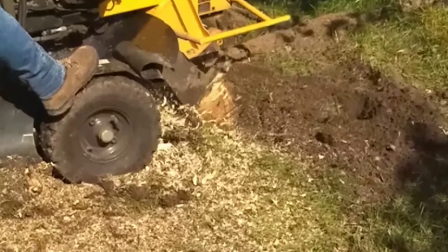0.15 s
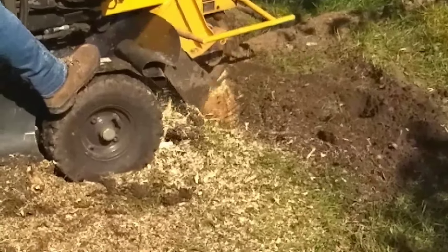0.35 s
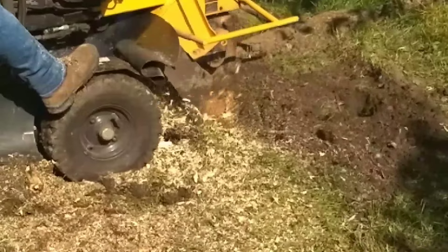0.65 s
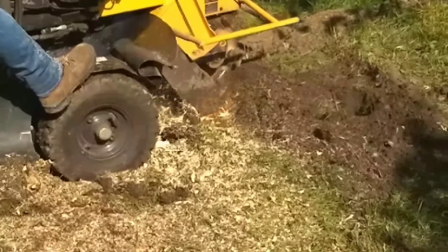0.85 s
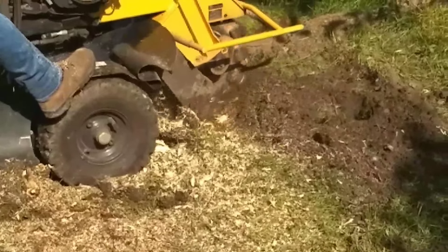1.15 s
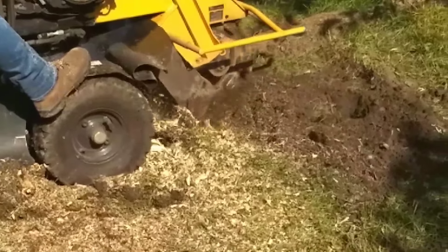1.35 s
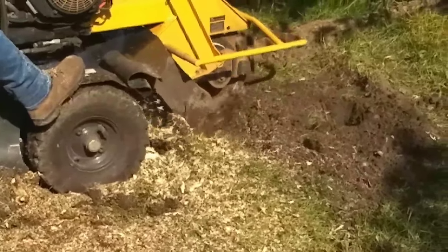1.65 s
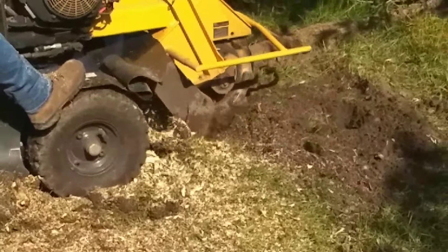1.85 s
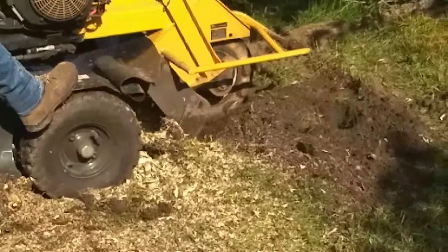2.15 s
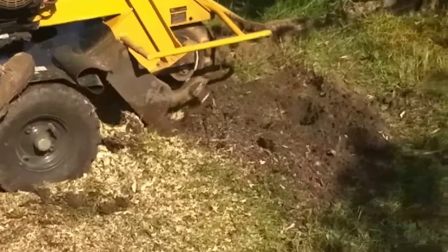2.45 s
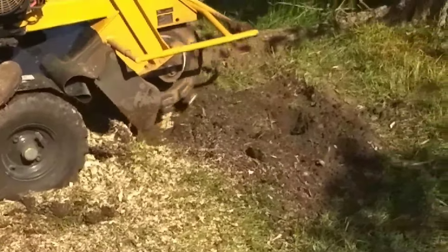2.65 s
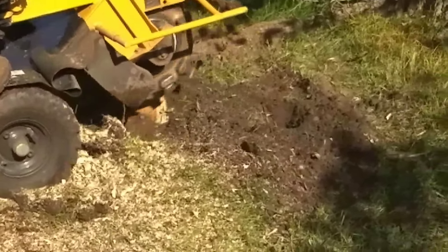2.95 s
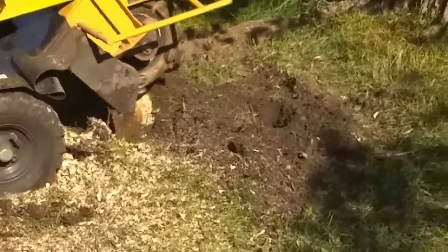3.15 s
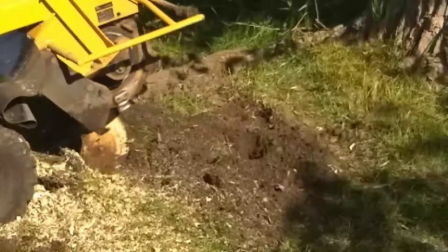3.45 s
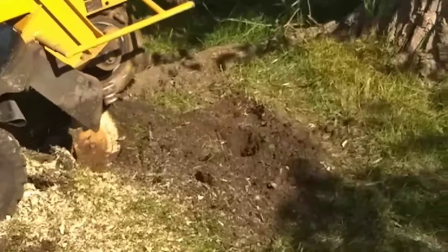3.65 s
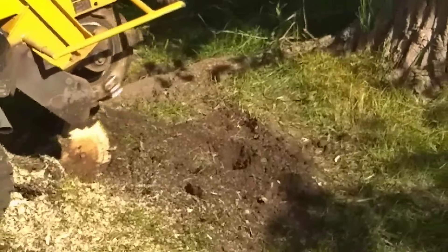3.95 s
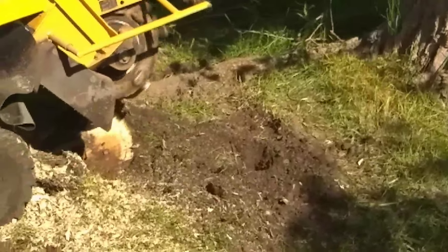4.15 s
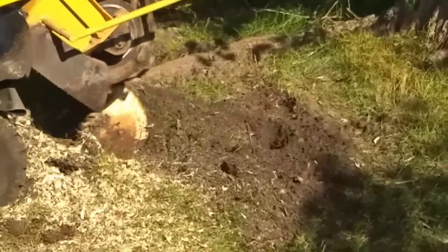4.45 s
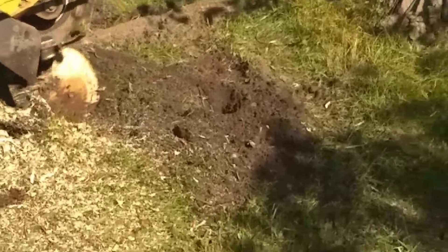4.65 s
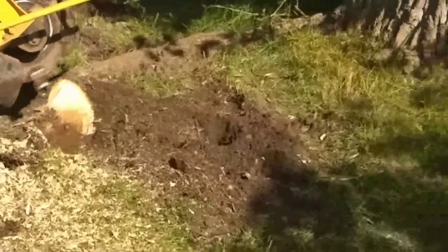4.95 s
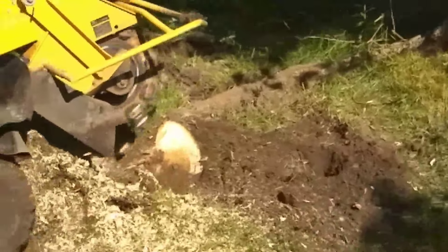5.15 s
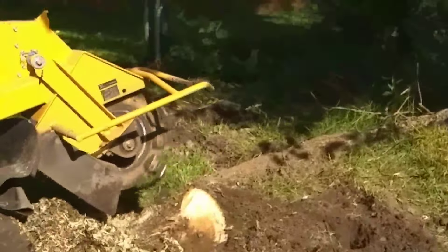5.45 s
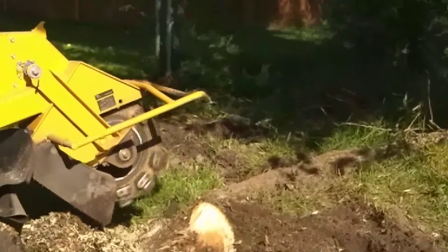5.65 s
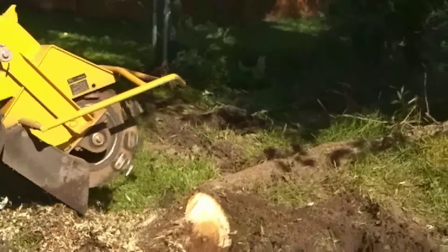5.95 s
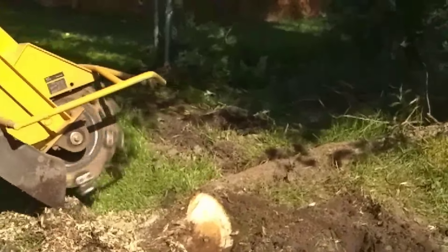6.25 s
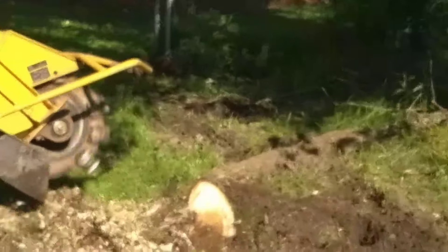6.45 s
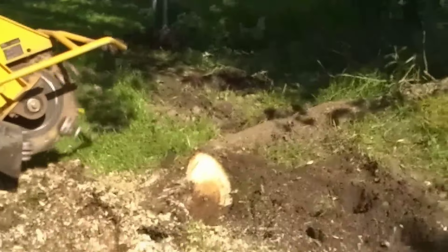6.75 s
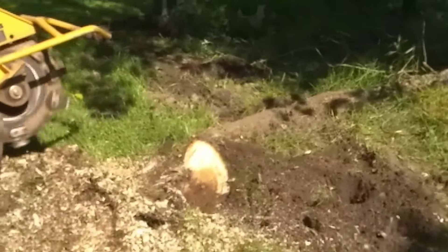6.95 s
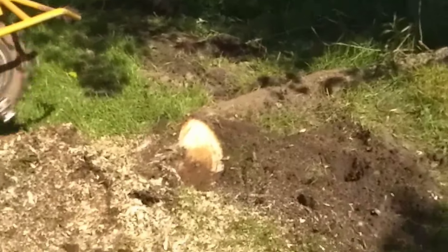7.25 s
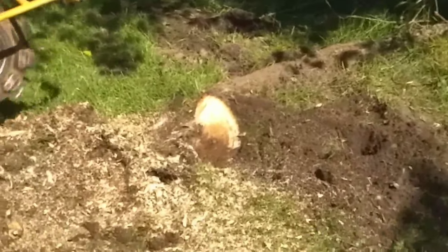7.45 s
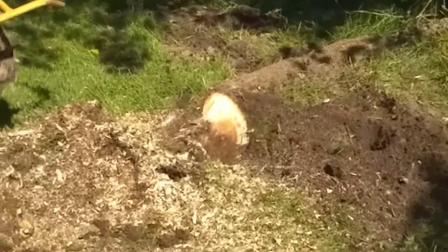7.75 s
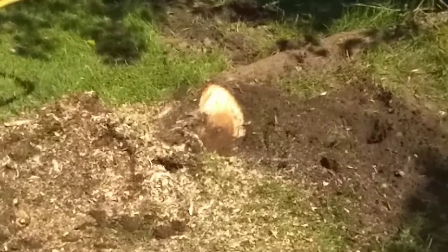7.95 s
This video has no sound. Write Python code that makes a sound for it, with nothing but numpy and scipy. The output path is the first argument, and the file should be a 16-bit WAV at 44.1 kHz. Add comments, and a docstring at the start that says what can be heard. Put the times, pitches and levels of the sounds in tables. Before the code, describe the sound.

Close by in a garden, a stump grinder's petrol engine runs loudly and steadily while the wheel's teeth rattle and rasp through wood. Early on comes a short burst of hard, ringing strikes. The grinding then fades, the engine picks up slightly, and the machine roars on unloaded, its wheel and drive whines swelling and fading in the hand-held microphone.

```python
"""A petrol stump grinder roars at full throttle in a garden, its wheel chewing a root.
The wheel strikes something hard, then spins free while the machine backs away. Teeth knock the wheel
into ringing and tear fibres; twin-cylinder exhaust and drive whine are tones geared to the engine;
casing, fan, muffler and a singing panel are band noise. A hand-held recorder mixes two capsules
to stereo and pulls its gain down at the hard strikes."""
import sys
import numpy as np
from scipy import signal
from scipy.fft import rfft, irfft, next_fast_len
from scipy.io import wavfile
from scipy.ndimage import map_coordinates

SR = 44100
rng = np.random.default_rng(int(sys.argv[2]) if len(sys.argv) > 2 else 0)


def put_to_file(sound):
    """Save the sound as 16-bit audio at rate SR, in the file named by the first command-line argument."""
    columns = np.atleast_2d(sound).T  # one column per channel
    safe = np.clip(columns, -1, 1)
    whole_steps = np.round(safe * 32767)
    wavfile.write(sys.argv[1], SR, whole_steps.astype(np.int16))


N = 357210
STEP = 40   # samples per control step

# A *_MOVE row: value in the hole, change with the lift, change with the turn while backing away.
LIFT_S, TURN_S = (1.27, 2.64), (3.4, 8.1)
PANEL_HZ, PANEL_WIDTH_HZ, PANEL_DB_MOVE = 3825, 447, (-49.5, 9, 9)
GROUND_LAGS_MS, GROUND_BAND_HZ = (0.61, 0.73), [1550, 6800]
GROUND_SHARES_MOVE = [(0.02, -0.15, -0.16), (0.022, 0.17, -0.081)]   # signed, a row per capsule

# four-stroke engine, recovering as the load comes off, then hunting: time_s, cycle_hz
ENGINE_SPEED = [(0, 28.3), (.62, 29.3), (1.0, 30.3), (1.3, 30.65), (1.55, 30.45), (2.5, 30.91),
                (3.75, 30.67), (4.4, 30.77), (4.8, 30.72), (5.25, 30.54), (5.8, 30.48), (6.5, 30.51),
                (7.4, 30.72), (7.8, 30.55), (8.1, 30.5)]
# roar of casing, fan and muffler: freq_hz, density_db
ROAR_SPECTRUM = [(40, -34), (100, -1), (220, -2.5), (380, 0.5), (550, 6.5), (900, 0.5), (1400, -3.5),
                 (2000, -8.5), (2500, -10), (2900, -14.5), (3300, -13), (3800, -8.5), (4500, -10),
                 (5500, -11), (7000, -19), (10000, -14.5), (15500, -9.5)]
# roar parts (rumble, roar, clatter, fizz, rasp, whirr, hiss): centre_hz
ROAR_PARTS_HZ = [250, 900, 1700, 2900, 3800, 6000, 11000]
# per roar part: hole_db, lift_change_db, turn_change_db
ROAR_PARTS_DB_MOVE = [(-25, 2, 0.5), (-23.5, 4.5, 0), (-21, 2.5, 2), (-17.5, -3.5, 3), (-20, 0, 4),
                      (-20, 5.5, -1.5), (-15.5, -0.6, 1.8)]
# roar as the distance shifts: time_s, gain_db
ROAR_NEARNESS = [(0, 2), (.7, 2.5), (1.4, 1.5), (1.9, 3), (2.3, 2), (2.62, 3.5), (2.9, 2), (3.2, 1.5),
                 (3.45, 3), (3.8, 2.34), (4.3, 2.3), (4.8, 1.5), (5.3, 2), (5.8, 2), (6.1, .5), (6.5, -0.5),
                 (6.9, 0), (7.3, .5), (8.1, 2)]
# likeness of the roar at the two capsules: freq_hz, coherence
ROAR_COHERENCE = [(60, 0.6), (250, 0.7), (800, 1), (2000, 0.4), (5000, 0), (9000, 0), (15000, 0.4)]

# wheel whine: multiple of the tooth-group rate
WHEEL_ORDERS = [4, 6, 7, 8, 9, 9, 9, 12, 12, 15, 15, 15, 15]
# per wheel order, swelling as a side of the machine faces the listener: peak_db, centre_s, width_s
WHEEL_SWELLS = [(-40.5, 7.4, 2.4), (-37.5, 3.05, 2.34), (-35, 4.66, 2.46), (-34.5, 3.7, 1.2),
                (-28, 6.72, 0.48), (-31, 5.87, 0.28), (-29, 7.5, 0.37), (-31, 2.65, .9), (-31, 5.02, 1.17),
                (-33.5, 5.52, 0.58), (-30.5, 6.62, 0.29), (-30.5, 8.05, 0.72), (-34, 2.84, 1.6)]
# engine whine: multiple of the cycle rate
ENGINE_ORDERS = [4, 5, 5, 32, 40, 44, 44, 48, 56]
# per engine order: peak_db, centre_s, width_s
ENGINE_SWELLS = [(-36.5, 1.8, 2.5), (-26.5, 0.59, 0.34), (-34, 6.7, 3.9), (-34.5, 0.48, 0.1),
                 (-35, 2.57, 1.44), (-34.5, 3.7, 1.34), (-37.5, 0.18, 0.37), (-39, 5.4, 1.64),
                 (-40, 2.7, 1.3)]
# hydraulic drive whine: multiple of the cycle rate
PUMP_ORDERS = [24.97, 26.54, 26.54, 26.54, 29.55, 32.45, 32.45, 32.45, 32.45]
# per pump order: peak_db, centre_s, width_s
PUMP_SWELLS = [(-38.5, 6.6, 1.07), (-26, 3.58, 0.31), (-37, 1.96, 0.47), (-32.5, 4.5, .3), (-37, 5.1, 1.7),
               (-28, 3.33, 0.23), (-29, 4.15, .3), (-30, 4.9, 0.16), (-34.5, 7.2, 0.56)]

# exhaust tones: multiple of the cycle rate
EXHAUST_ORDERS = [2, 3, 6, 7, 8, 9, 10, 12, 14]
# per exhaust order: relative_db
EXHAUST_ORDER_DB = [-3.5, -17, -5.5, -18.5, -16.5, -16.5, -25, -26.5, -21]
# per exhaust order, under the opening load: change_db
EXHAUST_LOAD_DB = [5, 2, -0.2, 7, -3.5, -4, .1, 5, 10]
EXHAUST_DB_MOVE = (-30, 0.7, -2.5)
GROUPS_PER_CYCLE, SLIP_PER_CYCLE, GRIP_S = 2.293, 0.055, 1.2   # tooth groups; belt slip dies away

# modes of wheel and guard: freq_hz, gain_db, t60_s
WHEEL_MODES = [(1760, 1.5, 0.0047), (1180, -13, 0.019), (3120, -6.5, 0.0029), (3720, 0.5, 0.0061),
               (5840, -29, .005), (8700, -35, 0.0032)]
# teeth in the wood: time_s, bite_db, rasp_hz
WOOD_BITE = [(0, -34, 1253), (.35, -28.5, 1240), (.5, -29.5, 1130), (.7, -29.5, 1178), (1.0, -28.5, 1127),
             (1.25, -31.5, 1100), (1.35, -32, 1130), (1.43, -27.5, 1133), (1.5, -34, 1125),
             (1.8, -31, 1132), (2.5, -47, 1140)]
# tooth groups biting harder grain: near_s, impulse_db
WOOD_KNOTS = [(0.0389, -19.5), (0.0857, -20), (0.1017, -16), (0.2883, -18), (0.5208, -16), (0.5667, -18),
              (0.6116, -14), (0.657, -15), (0.7038, -15), (0.7617, -17), (0.8804, -16), (0.9109, -16),
              (0.9528, -18), (0.9677, -18), (1.0126, -19), (1.0411, -13), (1.1423, -12.5), (1.1718, -14),
              (1.1853, -15), (1.2287, -22), (1.2436, -15), (1.2711, -16), (1.3005, -14), (1.3444, -15)]
# blows on something hard, group after group, then now and again: start_s, impulse_db
HARD_STRIKES = [(1.4165, -15), (1.4303, -11), (1.4443, -4.5), (1.459, 0.5), (1.4729, -3), (1.4886, -9),
                (1.5028, -8), (1.5184, -16), (1.5316, -14), (1.547, -29), (1.5612, -14), (1.6148, -20),
                (1.678, -20), (1.705, -27)]
HARD_SPAN_S, FIRST_FULL_BLOW_S = (1.41, 1.565), 1.4447

# stereo equaliser and notch leak: freq_hz, mid_db, side_db, mid_leak, side_leak
MID_SIDE_PATHS = [(57, 13.5, -13.5, 0.11, .12), (250, 10.5, -6, 0.26, .12), (750, 5, -7, 0.1, 0.13),
                  (1640, 4.5, 8.5, 0.026, 0.19), (2450, 4, 6, 0.017, .2), (2800, 6.5, 11, 0.1, .25),
                  (3620, 4.5, 5, 0.44, 0.1), (4800, 1.5, 1, 0.45, 0.17), (7120, 2.5, 3, 0.43, 0.18),
                  (14000, -16, -15, 0.22, 0.16)]
MATRIX_DELAY_MS, CUTOFF_HZ = 0.4346, 15620
LEAK_MOVE = (0.57, 0.11, 0.32)   # grows as the machine goes off axis
CAPSULE_2_DB_MOVE, CAPSULE_2_LAG_MS_MOVE = (-2, 2.5, 1), (0.034, -0.072, 0.035)


def from_db(db):
    """Decibels to gain."""
    return 10 ** (np.asarray(db) / 20)


def unit_rms(x):
    """Scale to rms 1."""
    return x / np.sqrt(np.mean(x ** 2) + 1e-20)


def in_time(rows):
    """Table columns, interpolated per sample."""
    times_s, *columns = np.transpose(rows)
    return [np.interp(np.arange(N) / SR, times_s, column) for column in columns]


def at_hz(rows, hz, column=1):
    """A table column, interpolated over log frequency."""
    table = np.array(rows)
    return np.interp(np.log(hz), np.log(table[:, 0]), table[:, column])


def per_sample(control):
    """Control steps to samples."""
    return np.interp(np.arange(N) / STEP, np.arange(len(control)), control)


def moved(row):
    """A *_MOVE row, per sample."""
    hole, lift, turn = row
    t = np.arange(N) / SR
    return hole + lift * np.interp(t, LIFT_S, (0, 1)) + turn * np.interp(t, TURN_S, (0, 1))


def filtered(x, order, hz, kind):
    """Butterworth filter."""
    return signal.sosfilt(signal.butter(order, hz, kind, fs=SR, output="sos"), x)


def drift(rate_hz):
    """Slow random control, rms 1."""
    pole = np.exp(-2 * np.pi * STEP * rate_hz / SR)
    settle = 2000
    white = rng.standard_normal(N // STEP + 1 + settle)
    return unit_rms(signal.lfilter([1], [1, -2 * pole, pole * pole], white)[settle:])


def tone(turns, rms, waver_db, wobble_rad):
    """A sine on a phase control, wavering in level and phase."""
    phase = 2 * np.pi * (turns + rng.random()) + wobble_rad * (drift(3.4) + 0.59 * drift(10.7))
    amplitude = np.sqrt(2) * rms * from_db(waver_db * drift(8.1))
    return per_sample(amplitude) * np.sin(per_sample(phase))


def panel():
    """A panel sings in the air stream: flickering noise in one resonance."""
    band_hz = [PANEL_HZ - PANEL_WIDTH_HZ / 2, PANEL_HZ + PANEL_WIDTH_HZ / 2]
    level_db = moved(PANEL_DB_MOVE) + per_sample(1.2 * drift(4))
    return from_db(level_db) * unit_rms(filtered(rng.standard_normal((2, N)), 1, band_hz, "band"))


def with_ground_echo(x):
    """Treble arrives again off the ground, with its own lag at each capsule."""
    late = [np.pad(one, (round(ms * SR / 1000), 0))[:N] for one, ms in zip(x, GROUND_LAGS_MS)]
    shares = [moved(row) for row in GROUND_SHARES_MOVE]
    return x + shares * filtered(late, 1, GROUND_BAND_HZ, "band")


def roar(cycles):
    """Casing, fan and muffler: flickering third-octave noise, puffed by the firings."""
    nearness_db, = in_time(ROAR_NEARNESS)
    parts_db = np.array([moved(row) + nearness_db for row in ROAR_PARTS_DB_MOVE])[:, ::STEP]
    edges_hz = 41 * 2 ** np.arange(0, 8.7, 1 / 3)
    sway_db = 0.5 * drift(3)
    phase = 2 * np.pi * cycles
    firing_db = 0.32 * (np.cos(2 * phase) + 0.6 * np.cos(phase + 1) + 0.5 * np.cos(4 * phase))
    white = rng.standard_normal((2, 2, N))
    out = 0
    for k, (low, high) in enumerate(zip(edges_hz, edges_hz[1:])):
        hz = np.sqrt(low * high)
        first, unrelated = filtered(white[k % 2], 2, [low, high], "band")
        coherence = np.clip(at_hz(ROAR_COHERENCE, hz), 0, 1)
        second = coherence * first + np.sqrt(1 - coherence ** 2) * unrelated
        weights = [np.interp(np.log(hz), np.log(ROAR_PARTS_HZ), part) for part in np.eye(len(parts_db))]
        level_db = at_hz(ROAR_SPECTRUM, hz) + np.dot(weights, parts_db) + 6
        flicker_db = sway_db + 1.15 * drift(9) + firing_db
        out = out + per_sample(from_db(level_db + flicker_db)) * np.array([first, second])
    return out


def whine(orders, swells, turns, wobble_rad=1.0, waver_db=2.0, flatness=2):
    """Tones of a rotating part, each swelling and fading; low orders waver less."""
    t = np.arange(len(turns)) * STEP / SR
    out = 0
    for order, (peak_db, centre_s, width_s) in zip(orders, swells):
        swell = from_db(peak_db) * np.exp(-0.5 * np.abs((t - centre_s) / width_s) ** flatness)
        unrest = min(order / 12, 1)
        out = out + tone(order * turns, swell, waver_db * unrest, wobble_rad * unrest)
    return out


def exhaust(cycles):
    """Low orders of the uneven twin firing; the load eases as the belt grips."""
    level_db = moved(EXHAUST_DB_MOVE)[::STEP]
    load = np.exp(-np.arange(len(cycles)) * STEP / SR / GRIP_S)
    return sum(tone(k * cycles, from_db(db + level_db + load_db * load), waver_db=1.2, wobble_rad=0.051)
               for k, db, load_db in zip(EXHAUST_ORDERS, EXHAUST_ORDER_DB, EXHAUST_LOAD_DB))


def wheel_ring(impulses, low_cut_hz=800):
    """Impulses ring the wheel and guard; a small wheel radiates no bass."""
    out = 0
    for hz, gain_db, t60_s in WHEEL_MODES:
        radius, angle = 10 ** (-3 / (t60_s * SR)), 2 * np.pi * hz / SR
        feedback = [1, -2 * radius * np.cos(angle), radius ** 2]
        out = out + from_db(gain_db) * signal.lfilter([0, np.sin(angle)], feedback, impulses + 1e-18)
    return filtered(out, 2, low_cut_hz, "high")


def wood_knocks(groups, spread_db=1.6):
    """Each tooth group knocks the wheel as it meets the root, harder at knots."""
    bite_db, _ = in_time(WOOD_BITE)
    arrivals = np.diff(np.floor(groups), prepend=np.floor(groups[0]))
    scatter_db = spread_db * np.clip(rng.standard_normal(N), -2, 2)
    impulses = arrivals * from_db(bite_db + 10.5 + scatter_db)
    onsets = np.flatnonzero(arrivals)
    for near_s, impulse_db in WOOD_KNOTS:
        nearest = onsets[np.argmin(np.abs(onsets - near_s * SR))]
        impulses[nearest] = from_db(impulse_db)
    impulses[round(HARD_SPAN_S[0] * SR):round(HARD_SPAN_S[1] * SR)] = 0   # hard strikes take over
    return wheel_ring(impulses)


def tearing_fibres(groups, rasp_width_hz=130):
    """Each tooth group tears fibres: a burst of hiss and a pitched rasp."""
    bite_db, rasp_hz = in_time(WOOD_BITE)
    burst = np.exp(-5 * (groups % 1)) + 0.35 * np.exp(-5 * ((groups + 0.5) % 1))
    hiss = filtered(rng.standard_normal((2, N)), 1, [2500, 11000], "band")
    roughness = filtered(rng.standard_normal((2, N)), 1, rasp_width_hz / 2, "low")
    phase = 2 * np.pi * np.cumsum(rasp_hz) / SR
    rasp = roughness[0] * np.cos(phase) + roughness[1] * np.sin(phase)
    return from_db(bite_db) * (from_db(11) * burst * hiss + from_db(22) * (0.68 + 0.57 * burst) * rasp)


def hard_strikes(crumble_ms=1.5, crumble_share=0.1, contact_hz=4000):
    """Hard blows ring the wheel; each crumbles briefly and is slightly blunt."""
    impulses = np.zeros(N)
    for start_s, impulse_db in HARD_STRIKES:
        impulses[round(start_s * SR)] = -from_db(impulse_db)
    pole = np.exp(-1000 / (crumble_ms * SR))
    crumbling = signal.lfilter([crumble_share], [1, -pole], impulses) * rng.standard_normal(N)
    return wheel_ring(filtered(impulses + crumbling, 2, contact_hz, "low"))


def scene():
    """The grinder at the two capsules."""
    cycle_hz, = in_time(ENGINE_SPEED)
    cycles = (np.cumsum(cycle_hz) / SR)[::STEP]
    gearing = GROUPS_PER_CYCLE - SLIP_PER_CYCLE * np.exp(-np.arange(N) / SR / GRIP_S)
    groups = np.cumsum(cycle_hz * gearing) / SR   # tooth groups passed
    groups -= groups[round(FIRST_FULL_BLOW_S * SR)]   # one arrives on that blow
    whines = (whine(WHEEL_ORDERS, WHEEL_SWELLS, groups[::STEP], flatness=3)
              + whine(ENGINE_ORDERS, ENGINE_SWELLS, cycles)
              + whine(PUMP_ORDERS, PUMP_SWELLS, cycles, wobble_rad=0.4, waver_db=1.5, flatness=4))
    tones = whines + exhaust(cycles)
    cutting = hard_strikes() + wood_knocks(groups) + tearing_fibres(groups)
    first, second = tones + cutting + with_ground_echo(roar(cycles)) + panel()
    read_at = np.arange(N) - moved(CAPSULE_2_LAG_MS_MOVE) * SR / 1000
    second = map_coordinates(second, [read_at], order=2, mode="nearest")
    return np.array([first, from_db(moved(CAPSULE_2_DB_MOVE)) * second])


def gain_control(x, ceiling_db=1, attack_ms=0.16, release_s=0.68):
    """Peaks over the ceiling pull the gain down fast; it creeps back exponentially."""
    peak_db = 20 * np.log10(np.abs(x).max(axis=0) + 1e-9)
    over_db = np.maximum(peak_db - ceiling_db, 1e-3)
    fall = np.arange(N) / SR / release_s
    held_db = np.exp(np.maximum.accumulate(np.log(over_db) + fall) - fall)
    pole = np.exp(-1000 / (attack_ms * SR))
    return x * from_db(-signal.lfilter([1 - pole], [1, -pole], held_db))


def record(dry):
    """Delay-and-subtract makes mid, delay-and-add side; a leak fills their interleaved notches."""
    size = next_fast_len(N + 4096)
    hz = np.maximum(np.arange(size // 2 + 1) * SR / size, 1)
    mid_db, side_db, mid_leak, side_leak = (at_hz(MID_SIDE_PATHS, hz, c) for c in (1, 2, 3, 4))
    half_phase = np.pi * hz * MATRIX_DELAY_MS / 1000
    subtract, add = np.sin(half_phase), np.cos(half_phase)
    spectra = rfft(dry, size) * from_db([mid_db, side_db])
    combed = irfft(spectra * [subtract, add], size)[:, :N]
    leak = irfft(spectra * 1j * [mid_leak * add, side_leak * subtract], size)[:, :N]
    mid, side = combed + moved(LEAK_MOVE) * leak
    stereo = np.clip(gain_control(np.array([mid + side, mid - side])), -1, 1)
    return signal.sosfilt(signal.cheby2(24, 60, CUTOFF_HZ, fs=SR, output="sos"), stereo)


dry = scene()
out = record(dry)
put_to_file(out)
```